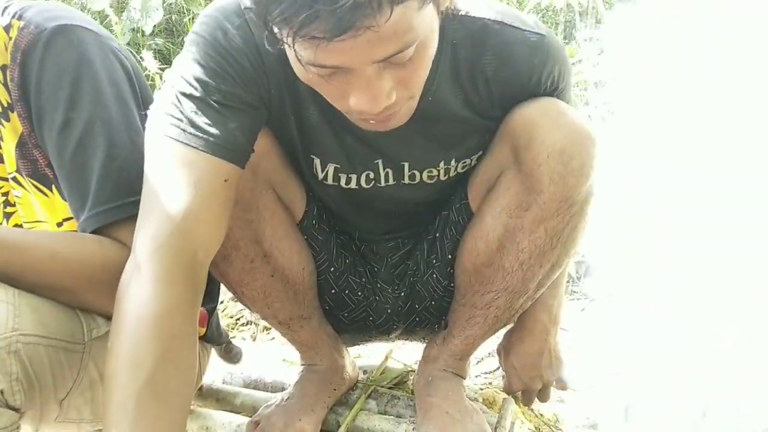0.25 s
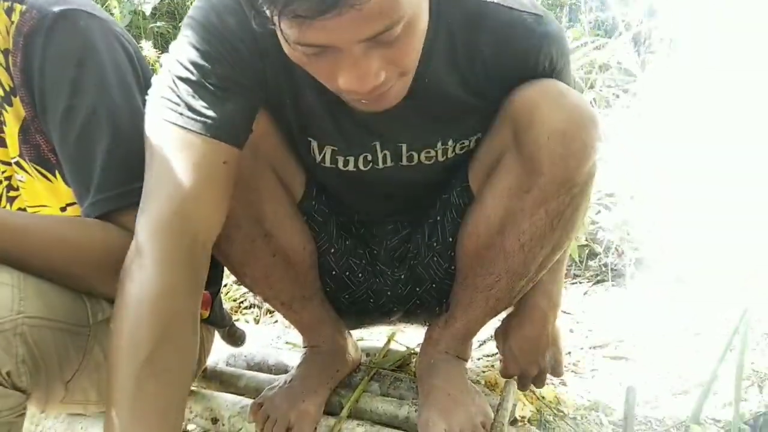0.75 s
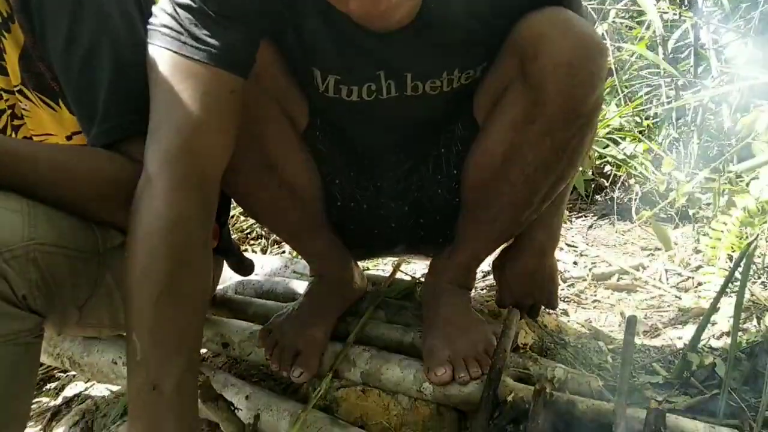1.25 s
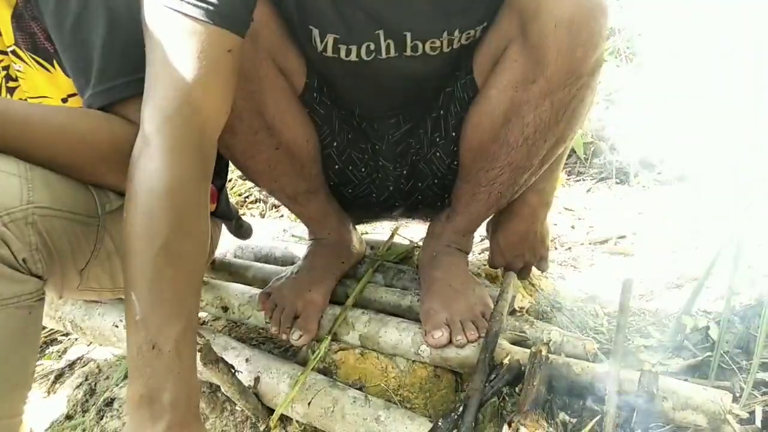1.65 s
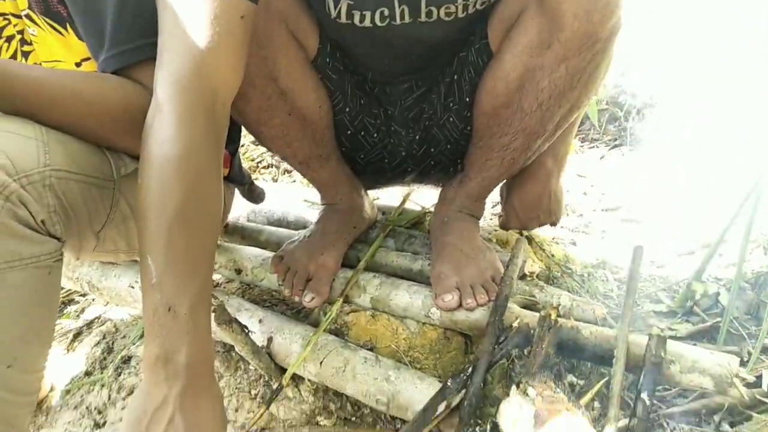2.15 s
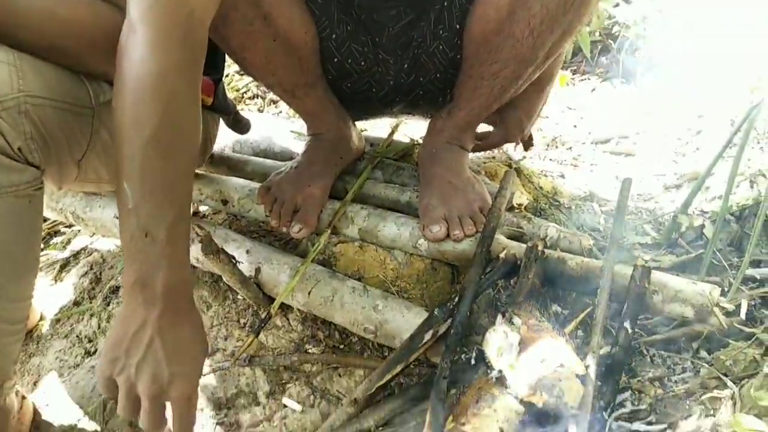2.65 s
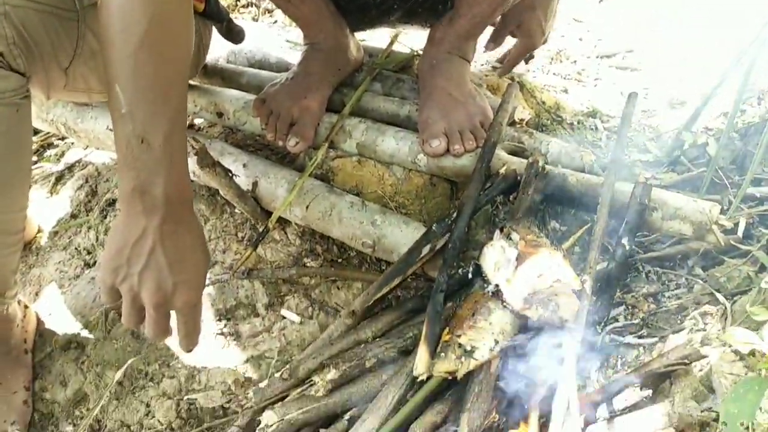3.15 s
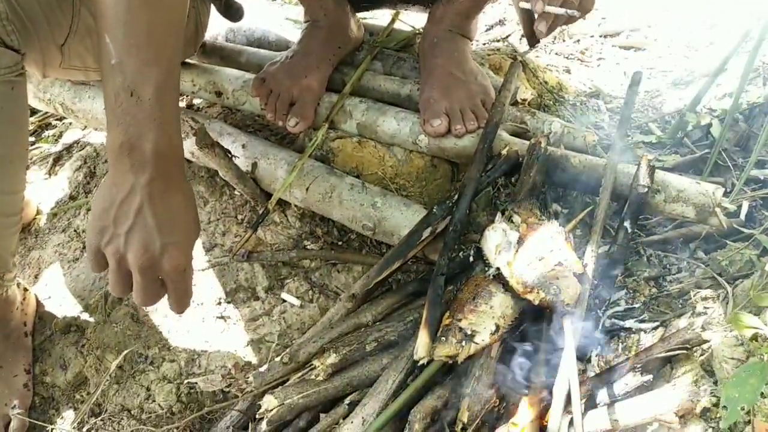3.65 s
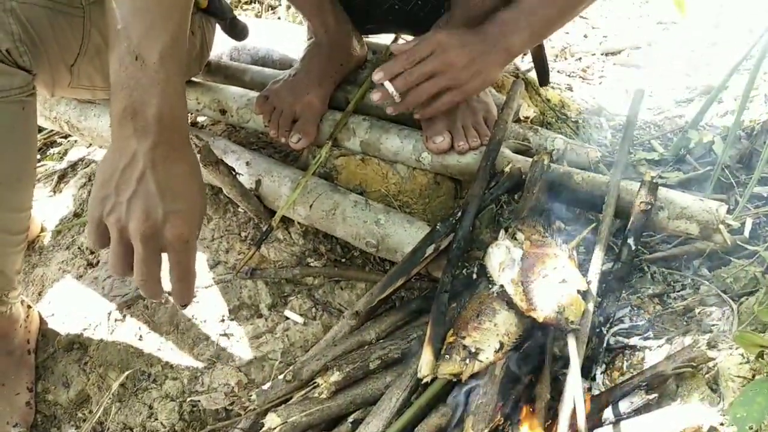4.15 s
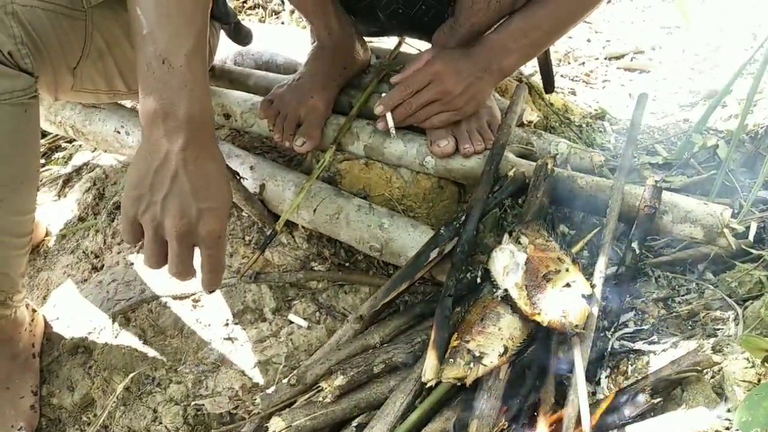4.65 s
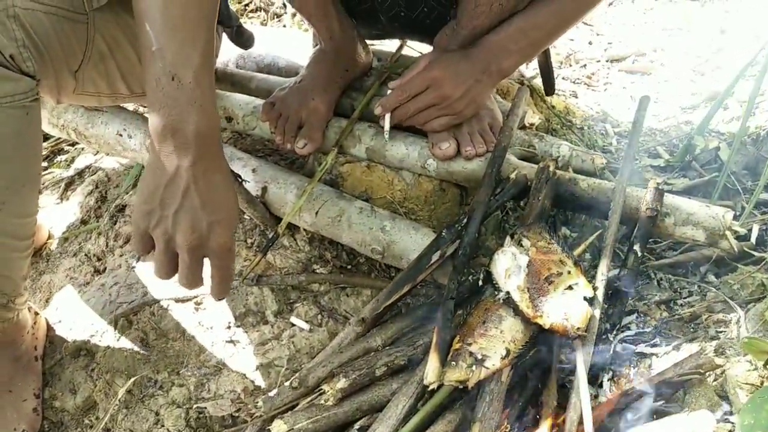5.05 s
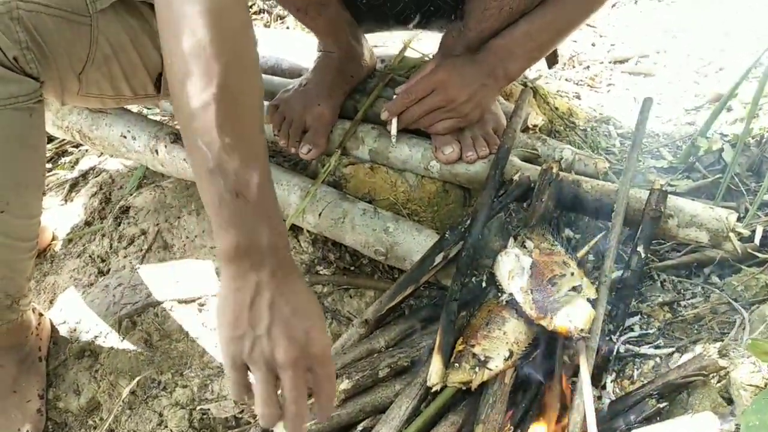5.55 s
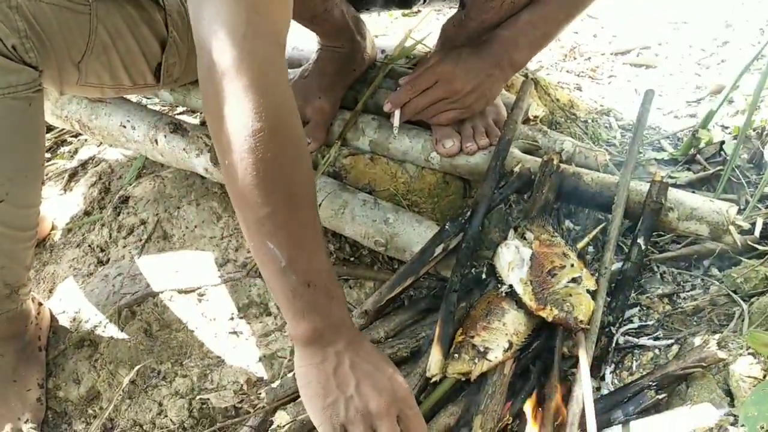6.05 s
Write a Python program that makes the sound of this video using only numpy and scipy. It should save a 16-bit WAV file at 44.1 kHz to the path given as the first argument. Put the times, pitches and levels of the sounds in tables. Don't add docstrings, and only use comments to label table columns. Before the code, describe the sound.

Steady bright insect drone fills a quiet outdoor clearing, above a very soft low bed of air, flame murmur and a far motor. Near the microphone, a twig fire gives irregular crisp ticks, pops and short hisses. A hoarse far trill opens, another follows, then short husky bird whistles echo among trees. Near the end a single hard wood crack jumps out, followed by a few faint ticks.

```python
import sys
import numpy as np
from scipy import signal
from scipy.fft import rfft, irfft
from scipy.io import wavfile
from scipy.ndimage import uniform_filter1d

SR = 44100
rng = np.random.default_rng(int(sys.argv[2]) if len(sys.argv) > 2 else 0)


def undo_db(level):
    steps = np.asarray(level, float) / 20
    return 10 ** steps


def dump_mix(stems):
    frames = np.atleast_2d(stems).T
    limited = np.clip(frames, -1, 1)
    pcm = np.round(limited * 32767).astype(np.int16)
    wavfile.write(sys.argv[1], SR, pcm)


N = 277962

# start in seconds, peak in dB, colour in Hz, left minus right in dB.
POPS = [(.008, -39, 1770, 5), (0.047, -37.5, 1380, -0.5), (1.364, -45.5, 444, .5), (2.5, -34.5, 2740, 5),
        (2.5007, -32, 2500, -6), (3.143, -47, 850, -1), (3.258, -53, 800, -3), (3.704, -51.5, 930, 3),
        (4.7361, -40.5, 6440, 5), (4.756, -48, 1410, 0), (5.98, -49.5, 1280, -1)]
# start in seconds, peak in dB, colour in Hz.
TICKS = [(.119, -40, 13500), (.49, -46, 109), (.581, -45, 1700), (.614, -37.5, 1800), (0.658, -29, 5640),
         (.666, -31.5, 4960), (1.072, -40, 2080), (1.405, -63, 500), (1.575, -46.5, 2200), (1.96, -50, 120),
         (2.4274, -44.5, 3200), (2.488, -44, 1700), (2.655, -42.5, 563), (2.7, -52, 3500),
         (3.54, -50.5, 250), (3.9696, -32, 3160), (3.9705, -36, 6500), (4.0168, -37, 13000),
         (5.3173, -44, 6500), (6.149, -28.5, 8850)]
# start in seconds, peak in dB, colour in Hz, 60 dB decay in seconds.
SPITS = [(0.4464, -36.5, 4000, 0.024), (.868, -41, 3500, 0.043), (1.6337, -39, 9000, .015),
         (1.776, -37.5, 1950, 0.027), (2.371, -36, 3980, 0.033), (2.961, -37, 2590, 0.022),
         (3.535, -31.5, 4290, 0.086), (4.3367, -35, 4900, 0.022), (6.1235, -37, 6000, .012),
         (6.15, -39, 2980, .02), (6.28, -41, 1950, 0.088)]
POP_OCTAVES, TICK_OCTAVES, SPIT_OCTAVES = 0.25, 0.48, 1.9
POP_T60_S, TICK_T60_S, T60_FALL = 0.049, 0.035, 0.4
FIRE_LEAN_DB, CRACK_LEAN_DB = 2.5, 5
# start in seconds, level in dB, brightness from 0 to 1.
SNAPS = [
    (5.6008, -19, 0.64),
    (5.6012, -14, 0.67),
    (5.6041, -17, .26),
    (5.605, -21.5, 0.43),
    (5.6069, -23, 0.57),
    (5.6085, -32, 0.74),
    (5.6122, -34, 0.7),
    (5.619, -42, 0.5),
]
# frequency in Hz, gain in dB per Hz.
STICK_COLOUR = [(59, -14), (100, -9.5), (696, -12.5), (1320, -14), (1700, -2.5), (2300, 3), (2500, 1.5),
                (3100, -5), (4170, -17.5), (7260, -2), (9180, -11), (10000, -1.5), (12600, -22.5),
                (15000, -14), (16300, -31)]
# frequency in Hz, gain in dB per Hz.
CHORUS_COLOUR = [(4500, -32), (5500, -25), (6600, -13), (7300, 1), (7650, 5.5), (8000, 0), (8800, -14.5),
                 (9400, -12.5), (10600, -4), (11800, -13.5), (12500, -28), (13600, -27), (14500, -21.5),
                 (15500, -15.5)]
# time in seconds, level in dB.
CHORUS_DB = [(0.0, -51.5), (3.0, -53), (3.7, -52), (6.3, -53)]
# time in seconds, level in dB.
KATYDID_DB = [(1.0, -90), (1.6, -62), (3.2, -67), (4.4, -61.5), (6.31, -62)]
THROBS = [0.111, .24, .38, .63, 1.06, 1.32, 1.54, 1.879, 2.04, 2.285, 2.55, 2.825, 3.03, 3.31, 3.55, 3.77,
          4.04, 4.281, 4.54, 4.8, 5.031, 5.265, 5.516, 5.79, 6.028, 6.262]
# time in seconds, level in dB.
CRICKET_DB = [(0, -63.5), (1.1, -62), (1.8, -72), (2.3, -61), (3.0, -69.5), (3.8, -60), (5.0, -59),
              (6.3, -60.5)]
UNDER_HZ, UNDER_DB = 1800, -6.5
# start in seconds, length in seconds, start in Hz, end in Hz, level in dB.
NOTES = [(3.243, 0.027, 2030, 2710, -51.5), (3.448, 0.022, 2420, 2550, -54),
         (3.523, 0.032, 2404, 2236, -48), (3.736, 0.14, 2580, 2274, -58), (3.955, 0.019, 2150, 2490, -48.5),
         (3.973, 0.032, 2470, 2270, -43), (3.998, .026, 2280, 2480, -55), (4.006, 0.055, 2347, 3613, -51.5),
         (4.052, 0.027, 2470, 2325, -51), (4.209, 0.058, 2940, 2993, -50.5), (4.33, .11, 2910, 2956, -62),
         (4.369, 0.045, 2170, 2293, -53.5), (4.574, 0.034, 2230, 2750, -47),
         (4.622, 0.15, 2630, 2593, -62.5), (4.752, 0.023, 2167, 2400, -46.5),
         (4.845, 0.035, 2326, 3010, -56)]
# delay in seconds, length in seconds, start in Hz, end in Hz, level in dB.
PHRASE = [
    (0, 0.068, 4900, 5070, -4),
    (.065, .105, 3637, 4830, 1),
    (0.162, .055, 4840, 3850, -1),
]
# start in seconds, level in dB, lead-in level in dB.
SONGS = [
    (1.065, -67, -5),
    (3.378, -65.5, 1),
    (5.897, -72, 2.),
]
NEAR_LEAN_DB, FAR_LEAN_DB = 4.5, 9.5
# start in seconds, length in seconds, start in Hz, end in Hz, level in dB.
TRILLS = [
    (0.038, 0.51, 5750, 5160, -51.5),
    (1.903, 0.36, 5650, 5250, -51.5),
]
# time in seconds, resonance in Hz, level in dB.
MOTOR = [(0, 231, -68), (1.6, 298, -65), (3.4, 364, -60.5), (4.6, 385, -68), (6.31, 356, -65)]
# frequency in Hz, gain in dB per Hz.
AIR_COLOUR = [(26, -74), (45, -7), (106, 2), (264, -9), (353, -7), (392, -12.5), (472, -10), (731, -14.5),
              (778, -13), (1180, -16.5), (2340, -10.5), (2550, -11), (2770, -14.5), (4660, -22.5),
              (6500, -21), (8450, -52), (14300, -120)]
# time in seconds, level in dB.
AIR_DB = [(0.0, -65), (2.35, -65), (5.1, -67.5), (5.9, -67.5), (6.3, -65)]
# frequency in Hz, left-right likeness from 0 to 1.
LIKENESS = [(40, .78), (90, .9), (200, .94), (430, .88), (780, .5), (1150, .15), (16000, .05)]
# frequency in Hz, left minus right in dB.
BALANCE = [(100, 0), (500, 0), (2000, 2), (5000, 5.5), (7000, .6), (8000, 2.), (10700, -1.5), (15000, 6)]
EDGE_HZ = 15560


def read(points, hz):
    f, value = np.transpose(points)
    return np.interp(np.log(hz + 1), np.log(f + 1), value)


def curve(rows):
    s, *columns = np.transpose(rows)
    return [np.interp(np.arange(N) / SR, s, c) for c in columns]


def evened(x):
    return x / np.sqrt(np.mean(x ** 2) + 1e-20)


def add(mix, s, sound):
    part = mix[..., round(s * SR):][..., :sound.shape[-1]]
    part += sound[..., :part.shape[-1]]


def sides(lean_db):
    return undo_db(np.array([[lean_db / 2], [-lean_db / 2]]))


def resonate(x, hz, width):
    turn = np.exp(2j * np.pi * np.cumsum(hz * np.ones(x.shape[-1])) / SR)
    r = np.exp(-np.pi * width / SR)
    smooth = signal.lfilter([1 - r], [1, -r], x / turn + 1e-18)
    return 2 * (turn * smooth).real


def ring_twice(x, hz, width, second_width):
    return evened(resonate(resonate(x, hz, width), hz, second_width))


def trees(x, t60, first_s):
    taps = np.zeros((2, SR // 2))
    at = np.arange(0, SR // 2 - 20, 20) + rng.integers(0, 20, (2, (SR // 2 - 1) // 20))
    np.put_along_axis(taps, at, rng.choice([-1., 1.], at.shape), 1)
    t = np.arange(SR // 2) / SR
    tail = taps * undo_db(-60 * t / t60) * (1 - np.exp(-t / first_s))
    return signal.fftconvolve(x, tail / np.linalg.norm(tail[0]), axes=1)[:, :N]


def wash(spectrum, patchy_db, flicker_db):
    frames, hz = N // 256 + 5, np.fft.rfftfreq(1024, 1 / SR)
    a, b, c, d, drift = rng.standard_normal((frames, 513, 5)).T
    flicker = evened(uniform_filter1d(uniform_filter1d(drift, size=120, axis=0), size=4, axis=1))
    patches = evened(uniform_filter1d(uniform_filter1d(drift, size=8, axis=0), size=16, axis=1))
    same = np.clip(read(LIKENESS, hz), -1, 1)[:, None]
    left = a + 1j * b
    right = same * left + np.sqrt(1 - same ** 2) * (c + 1j * d)
    z = np.array([left, right]) * undo_db(np.outer([.5, -.5], read(BALANCE, hz)))[:, :, None]
    z = z * undo_db(read(spectrum, hz)[:, None] + patchy_db * patches + flicker_db * flicker)
    return evened(signal.istft(z, nperseg=1024, noverlap=768)[1][:, :N])


def puff(db, colour_hz, t60, octaves, lean_db):
    t, hz = np.arange(4096) / SR, np.fft.rfftfreq(4096, 1 / SR)
    z = rng.standard_normal((3, 4096))
    same = np.clip(read(LIKENESS, colour_hz), .3, 1)
    z = same * z[2] + np.sqrt(1 - same ** 2) * z[:2]
    octaves_off = np.log2((hz + 1) / colour_hz)
    burst = irfft(rfft(z) * np.exp(-.5 * (octaves_off / octaves) ** 2))
    burst = burst * undo_db(-60 * t / t60) * (1 - np.exp(-t * colour_hz / 2.0))
    return undo_db(db) * burst / abs(burst).max() * sides(lean_db)


def ticks():
    out = np.zeros((2, N))
    for s, db, hz, lean_db in POPS:
        add(out, s, puff(db, hz, POP_T60_S * (1000 / hz) ** T60_FALL, POP_OCTAVES, lean_db))
    for s, db, hz in TICKS:
        add(out, s, puff(db, hz, TICK_T60_S * (1000 / hz) ** T60_FALL, TICK_OCTAVES, FIRE_LEAN_DB))
    for s, db, hz, t60 in SPITS:
        add(out, s, puff(db, hz, t60, SPIT_OCTAVES, FIRE_LEAN_DB))
    return out


def crack():
    blows, t = np.zeros((2, N)), np.arange(900) / SR
    for s, db, bright in SNAPS:
        wake = rng.standard_normal((2, 900)) * undo_db(-60 * t / .008)
        dull = signal.lfilter(*signal.butter(2, 4000, fs=SR), wake)
        bright = np.clip(bright, 0, 1)
        snap = bright * (wake - dull) + (1 - bright) * dull
        add(blows, s, undo_db(db) * sides(CRACK_LEAN_DB) * snap * 2)
    other_side = blows.sum(0) - blows
    blows = blows + signal.lfilter(*signal.butter(2, 1100, fs=SR), other_side)
    log_gain = np.log(undo_db(read(STICK_COLOUR, abs(np.fft.fftfreq(4096, 1 / SR)))))
    colour = np.fft.ifft(np.exp(np.conj(signal.hilbert(log_gain)))).real
    out = signal.fftconvolve(blows, colour[None, :2048] / np.linalg.norm(colour), axes=1)[:, :N]
    t = np.arange(6000) / SR
    # Hz, dB, 60 dB decay in seconds
    for hz, db, t60 in [(185, -44.5, 0.065), (325, -33.5, 0.033), (465, -38, .03),
                        (980, -34.5, .02), (1240, -40, 0.014)]:
        add(out, SNAPS[0][0], undo_db(db - 60 * t / t60) * np.sin(2 * np.pi * hz * t))
    return out


def fire():
    near = ticks() + crack()
    short_scatter = undo_db(-18.5) * trees(near, t60=0.13, first_s=0.0023)
    long_scatter = undo_db(-27.0) * trees(near, t60=0.29, first_s=0.011)
    return near + short_scatter + long_scatter


def sputter():
    size = undo_db(5.5 * np.minimum(rng.exponential(1, N), 4)) * (rng.random(N) < 40. / SR)
    t = np.arange(400) / SR
    grain = resonate(rng.standard_normal((2, 400)), 1950, width=780.0) * undo_db(-60 * t / 0.033)
    return undo_db(-71.5) * evened(signal.fftconvolve(size[None], grain, axes=1)[:, :N])


def cicadas():
    return undo_db(curve(CHORUS_DB)[0] + 3.5) * wash(CHORUS_COLOUR, patchy_db=0.3, flicker_db=0.72)


def katydid():
    wander = evened(uniform_filter1d(rng.standard_normal(N), size=4000))
    turns = np.cumsum(114.9 * (1 + 0.0058 * wander)) / SR
    rasp = np.exp(5.9 * np.cos(2 * np.pi * turns)) * rng.standard_normal((2, N))
    return undo_db(curve(KATYDID_DB)[0]) * ring_twice(rasp, 10500, 780.0, 780.0)


def cricket():
    out, t = np.zeros(N), np.arange(round(.075 * SR)) / SR
    hz = 2400 + 120 * np.sin(np.pi * t / .11)
    for s in THROBS:
        db = np.interp(s, *np.transpose(CRICKET_DB))
        pulses = (0.44 + np.exp(0.94 * np.cos(2 * np.pi * 85 * t))) * rng.standard_normal(len(t))
        ring = ring_twice(pulses, hz, 240, 480)
        under = ring_twice(pulses, UNDER_HZ, 200, 400)
        add(out, s, undo_db(db) * (ring + undo_db(UNDER_DB) * under) * np.hanning(len(t)) ** .5)
    return out * sides(2.) + undo_db(-6) * trees(out[None], t60=.3, first_s=.005)


def whistle(length, start_hz, end_hz, db, rough, fade_db):
    u = np.arange(round(length * SR)) / (length * SR)
    hz = start_hz + (end_hz - start_hz) * u
    noise = rng.standard_normal(8000)[:len(u)]
    husk = ring_twice(noise, hz, .06 * start_hz, .14 * start_hz)
    tone = np.sin(2 * np.pi * np.cumsum(hz) / SR)
    return undo_db(db - fade_db * u) * (tone + rough * husk) * signal.windows.tukey(len(u), .6)


def birds():
    out = np.zeros((2, N))
    for s, *note in NOTES:
        add(out, s, whistle(*note, rough=.45, fade_db=6.) * sides(NEAR_LEAN_DB))
    for s, level_db, lead_db in SONGS:
        for (delay, *note), extra_db in zip(PHRASE, (lead_db, 0, 0)):
            sung = whistle(*note, rough=.65, fade_db=1.)
            add(out, s + delay, undo_db(level_db + extra_db) * sung * sides(FAR_LEAN_DB))
    return undo_db(1.2) * out + undo_db(4.) * trees(out, t60=0.76, first_s=0.0014)


def trills():
    far = np.zeros((2, N))
    for s, length, start_hz, end_hz, db in TRILLS:
        u = np.arange(round(length * SR)) / (length * SR)
        beat = (u * length * 32.0) % 1
        hz = (start_hz + (end_hz - start_hz) * u) * (1.08 - 0.16 * beat)
        hoarse = ring_twice(rng.standard_normal(len(u)), hz, 710.0, 6500.0)
        shape = np.sin(np.pi * beat) * undo_db(db - 11.3 * u) * signal.windows.tukey(len(u), .1)
        add(far, s, hoarse * shape * sides(3.5))
    return undo_db(3.5) * trees(far, t60=0.53, first_s=0.0011)


def motor():
    hz, db = curve(MOTOR)
    z = rng.standard_normal((2, N))
    return undo_db(db) * ring_twice(z[0] + 0.27 * z, hz, 116.0, 117.0)


def air():
    return undo_db(curve(AIR_DB)[0] + 9.5) * wash(AIR_COLOUR, patchy_db=1.5, flicker_db=1.)


def scene():
    insects = cicadas() + katydid() + cricket()
    return fire() + sputter() + insects + birds() + trills() + motor() + air()


def roll_off(x):
    return signal.sosfilt(signal.butter(12, 16480, fs=SR, output="sos"), x)


def record(dry):
    dry = signal.sosfilt(signal.butter(2, 62, "high", fs=SR, output="sos"), dry)
    dry = .42 * np.tanh(dry / .42)
    low_pass = signal.firwin(511, EDGE_HZ, window=("kaiser", 9), fs=SR)
    edge = signal.oaconvolve(dry, low_pass[None], "same")
    mix = edge + undo_db(-40.) * (dry - edge)
    return roll_off(mix)


dry = scene()
out = record(dry)
dump_mix(out)
```